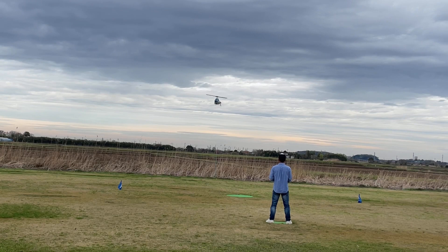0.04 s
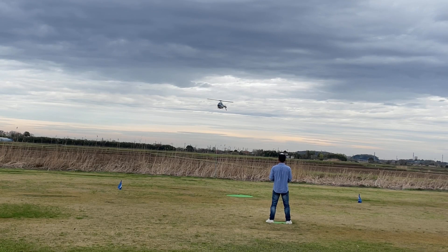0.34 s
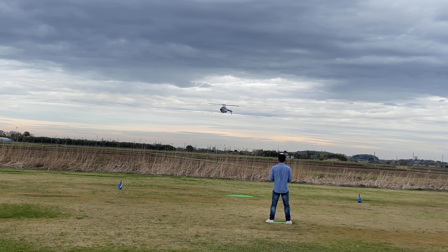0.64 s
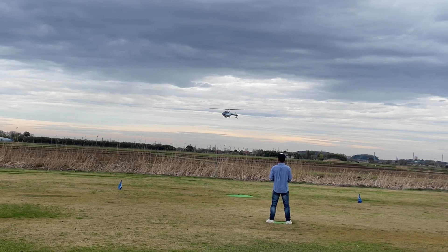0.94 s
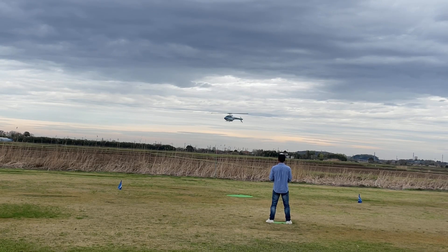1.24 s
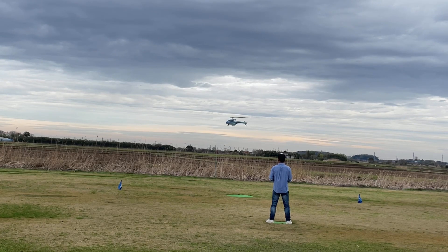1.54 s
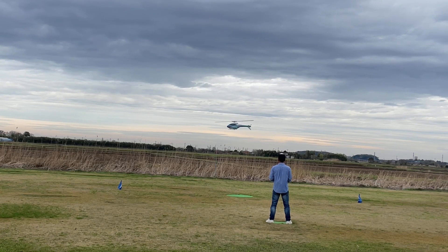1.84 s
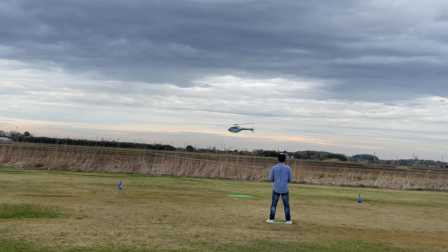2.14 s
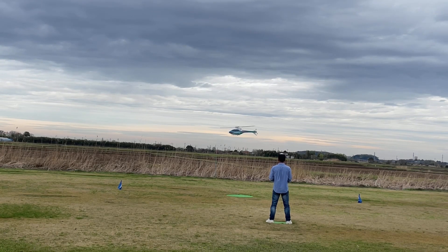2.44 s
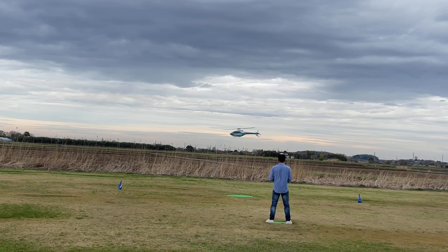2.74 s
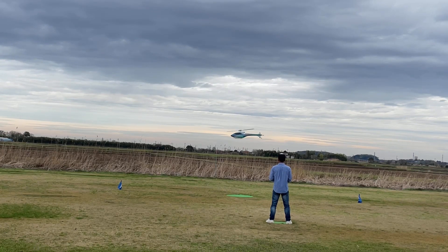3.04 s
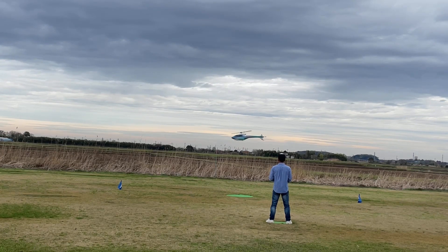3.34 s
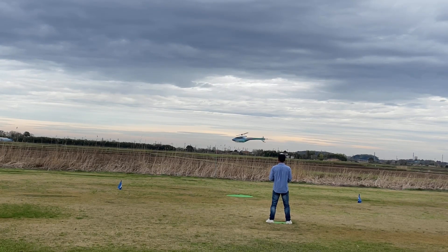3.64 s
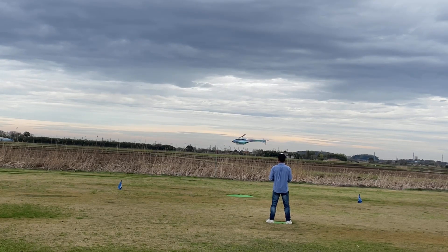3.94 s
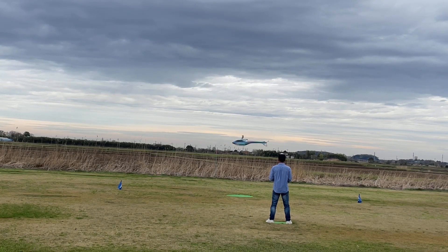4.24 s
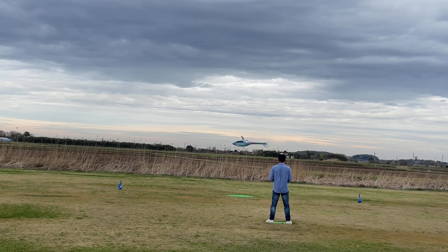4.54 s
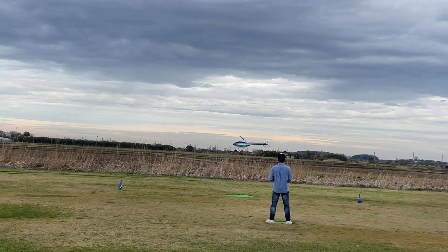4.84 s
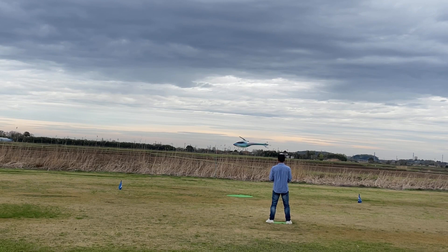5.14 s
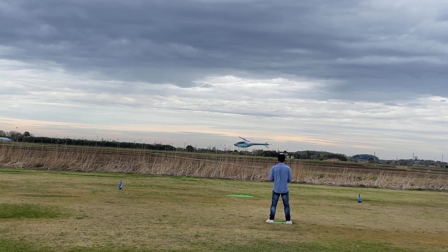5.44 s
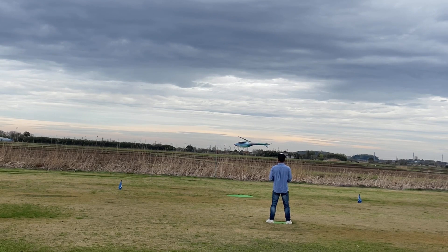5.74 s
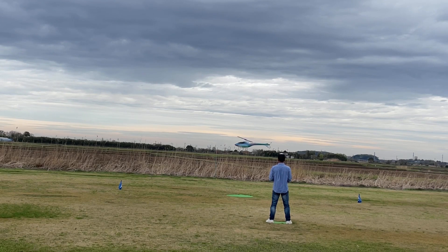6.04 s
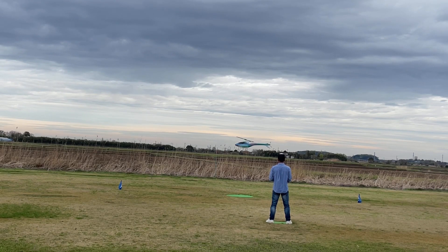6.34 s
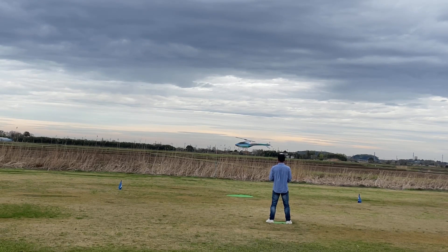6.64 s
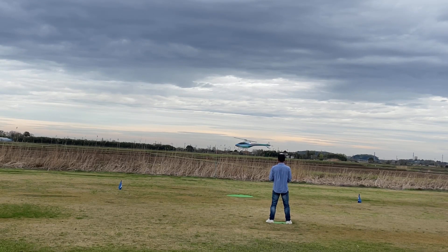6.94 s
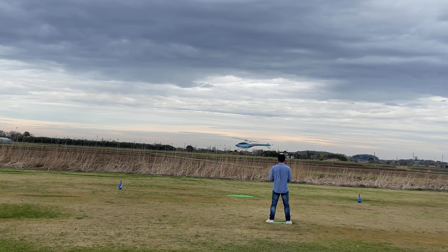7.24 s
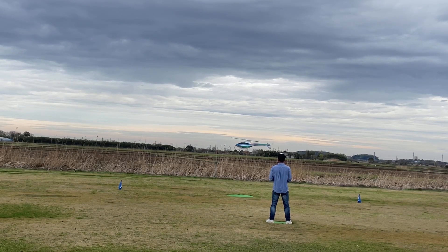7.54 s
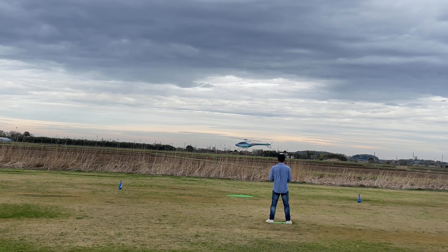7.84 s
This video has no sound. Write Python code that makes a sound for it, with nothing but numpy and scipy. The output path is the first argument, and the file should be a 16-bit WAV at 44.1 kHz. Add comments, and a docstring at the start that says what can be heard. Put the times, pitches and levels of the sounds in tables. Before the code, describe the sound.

An electric model helicopter drifts in over a grass field and settles into a low hover. Its blades swish and hiss, slapping harder midway, while the tail rotor drones and the gears whine thinly. Off to the left an engine idles, then briefly speeds up and runs down near the end. Light wind rumbles on the stereo microphones, and a far bird calls once, faintly.

```python
"""An electric model helicopter drifts in over a grass field and settles into a low hover.
Its main blades swish through the air and slap their own wake (the stirred air behind them), the tail
rotor drones and the gears whine. An echo off the ground sweeps the tone of the noise as it sinks.
Off to the left an engine idles, speeds up briefly and runs down. Light wind rumbles on the two
microphones, and a far bird calls once."""
import sys
import numpy as np
from scipy import signal
from scipy.fft import rfft, irfft
from scipy.io import wavfile

SR = 44100
rng = np.random.default_rng(int(sys.argv[2]) if len(sys.argv) > 2 else 0)


def unload_wav(signal):
    """Save mono or channel-first audio to the path in sys.argv[1] as 16-bit WAV at rate SR, clipped to [-1, 1]."""
    wavfile.write(
        sys.argv[1],
        SR,
        np.round(np.clip(np.atleast_2d(signal).T, -1, 1) * 32767).astype(np.int16),
    )


N = 348390
TIME, BINS_HZ = np.arange(N) / SR, np.fft.rfftfreq(N, 1 / SR)
TAIL_PER_MAIN = 7.579  # tail blade passes for each main blade pass
# how late the ground echo comes: (time [s], lag for the rotors [ms], lag for the blade tips [ms])
ECHO_LAGS = [(0, 1.52, 1.52), (.6, 1.38, 1.38), (1.2, 1.23, 1.23), (2, 1.09, 1.12), (2.6, 1.03, 1.08),
             (3.6, .95, 1.03), (4.2, .83, .82), (4.6, .8, .79), (7.9, .79, .8)]


def from_db(db):
    """Turn decibels into a gain to multiply by."""
    return 10 ** (np.asarray(db) / 20)


def rms_one(x):
    """Scale a signal to an average power of 1."""
    return x / np.sqrt(np.mean(x ** 2) + 1e-20)


def in_time(rows):
    """Read each column of a time table at every sample."""
    times, *columns = np.transpose(rows)
    return [np.interp(TIME, times, column) for column in columns]


def over_hz(points):
    """Read a table at every frequency, on a log scale."""
    hz, value = np.transpose(points)
    return np.interp(np.log(BINS_HZ + 1), np.log(hz), value)


def colour(x, spectrum):
    """Make some frequencies louder than others; the result has power 1."""
    return rms_one(irfft(rfft(x) * from_db(over_hz(spectrum)), N))


def noise(spectrum):
    """Noise with the given spectrum and power 1."""
    return colour(rng.standard_normal(N), spectrum)


def drift(rate):
    """A random wobble of typical size 1 that changes about `rate` times a second."""
    return rms_one(irfft(rfft(rng.standard_normal(N)) / (1 + (BINS_HZ / rate) ** 2), N))


def delayed(x, ms):
    """Make a signal late by a steady or moving lag."""
    fine = signal.resample_poly(x, up=4, down=1)
    return np.interp(TIME - ms / 1000, np.arange(4 * N) / (4 * SR), fine)


def lows_late(x, corner_hz):
    """An all-pass filter: the lows come late and the treble comes out upside down."""
    tangent = np.tan(np.pi * corner_hz / SR)
    weight = (tangent - 1) / (tangent + 1)
    return signal.lfilter([weight, 1], [1, weight], x)


def cycles(per_s):
    """Count the cycles done so far at a given rate."""
    return np.cumsum(per_s) / SR


def per_cycle(turn):
    """One random value for each cycle, changing halfway between whole counts."""
    return rng.uniform(-1.7, 1.7, size=1024)[np.round(turn).astype(int) % 1024]


def burst(turn, sharp, size_db):
    """A gain that rises and falls once a cycle; higher `sharp` makes it briefer."""
    return rms_one(np.exp(sharp * np.cos(2 * np.pi * turn)) * from_db(size_db))


def pulsing(turn, share, sharp, uneven_db, accent_db=0):
    """A gain that gathers a share (0-1) of the power into one burst a cycle."""
    bursts = burst(turn, sharp, uneven_db * per_cycle(turn)) * from_db(accent_db)
    return np.sqrt(1 - share + share * bursts ** 2)


def swells(rows, calm_db):
    """A gain with bell-shaped swells above a calm level."""
    bells = [from_db(db) * np.exp(-(2 * (TIME - peak_s) / length) ** 2) for peak_s, length, db in rows]
    return np.sqrt(from_db(calm_db) ** 2 + sum(bell ** 2 for bell in bells))


def turning(head_on, side_on, start_s=1, end_s=3.56):
    """Glide between two values as the helicopter turns from facing us to showing its side."""
    done = np.clip((TIME - start_s) / (end_s - start_s), 0, 1)
    return head_on + (side_on - head_on) * np.sin(np.pi * done / 2) ** 2


def over_grass(x, lag_ms, strength, soft_hz):
    """Add an echo off soft turf; it cancels some pitches, which rise as the lag shrinks."""
    echo = lows_late(delayed(x, lag_ms * (1 + 0.013 * drift(14))), soft_hz)
    return (x + strength * echo) / np.sqrt(1 + strength ** 2)


def at_microphones(x, fade_s=.12):
    """Each microphone hears its own level and timing, plus a faint, blurred echo."""
    # how much louder the left is: (frequency [Hz], left minus right [dB])
    balance = [(150, -1), (330, -2.2), (800, -1.8), (1500, -.2), (2200, -2.4), (3100, .8), (5000, -.4),
               (8000, 0)]
    # how far ahead the left is: (frequency [Hz], phase lead [radians])
    left_lead = [(20, 0), (2700, 0), (4200, -.2), (5500, -1.1), (6200, -1.4), (7000, -2.95), (7500, -3.14),
                 (8400, -3.1), (9000, -2.4), (10200, -1), (10600, -.1), (12100, .1), (12600, 1.1),
                 (14200, 3), (15800, 3.9)]
    # the faint, blurred echo, cut out around 8 kHz: (frequency [Hz], level [dB])
    blur_spectrum = [(200, -16.5), (1000, -17.5), (2500, -15), (5000, -9), (8000, -64), (14000, -11)]
    left = from_db(over_hz(balance) / 2) * np.exp(.5j * over_hz(left_lead))
    echoes = rng.standard_normal((2, SR // 8)) * from_db(-60 * TIME[:SR // 8] / fade_s)
    blur = rfft(echoes / np.linalg.norm(echoes[0]), N) * from_db(over_hz(blur_spectrum))
    return irfft(rfft(x) * (np.array([left, 1 / left]) + blur), N)


def wind(calm_db=-43.5):
    """Wind rumbles a little differently on each microphone; strong gusts reach higher in pitch."""
    # gusts, counted against calm_db: (peak time [s], length [s], strength [dB])
    gusts = [(1.12, 0.14, -35), (1.3, 0.21, -26.5), (1.75, 0.45, -29.5), (2.04, 0.17, -20.5),
             (2.26, 0.17, -26.5), (2.66, 0.055, -23), (2.82, 0.12, -28), (3.07, 0.073, -25),
             (3.37, 0.28, -26), (3.6, .1, -33), (4.05, 0.1, -30), (5.11, 0.16, -32), (7.16, 0.087, -37),
             (7.58, 0.084, -30)]
    # rumble of the breeze: (frequency [Hz], level [dB])
    breeze_spectrum = [(10, -32), (28, 7), (42, 8), (55, 22.5), (80, 14.5), (130, -14), (250, 1),
                       (600, -79)]
    # rumble of strong gusts: (frequency [Hz], level [dB])
    gust_spectrum = [(30, -7), (60, 1), (90, 18.5), (130, 2), (220, 2), (600, -101)]
    force = swells(gusts, calm_db + 3.2 * drift(4.6)) / from_db(calm_db)
    breeze_gain, gust_gain = from_db(-44) * force ** 0.23, from_db(-57.5) * force ** 1.08
    return sum(gain * (noise(spectrum) + 0.25 * np.array([noise(spectrum), noise(spectrum)]))
               for gain, spectrum in [(breeze_gain, breeze_spectrum), (gust_gain, gust_spectrum)])


def bird(start_s=5.33, length_s=.11, top_hz=7100, fall_hz=3250):
    """A far bird sings one thin note that falls ever faster."""
    done = np.clip((TIME - start_s) / length_s, 0, 1)
    note = np.sin(2 * np.pi * cycles(top_hz - fall_hz * done ** 2))
    return from_db(-51) * np.sin(np.pi * done) ** 2 * note


def engine(smear=.106):
    """Each firing rings the exhaust, smeared by the pipe, and lets out a puff of noise."""
    # how hard the engine works: (time [s], relative level [dB], unevenness [0-1])
    load = [(0, -32, 0.23), (3, -32, 0), (6.9, -31.5, 0), (7.08, -33, 0.3), (7.22, -34.5, 0.7),
            (7.4, -40, 0.3), (7.57, -39.5, 0.1), (7.72, -43, 0.5), (7.9, -51, 0.1)]
    # its speed: (time [s], firing rate [1/s])
    speed = [(0, 28.47), (2.5, 28.52), (3.6, 28.39), (4.2, 28.48), (5.2, 28.56), (5.9, 28.46), (7.1, 28.53),
             (7.24, 31.5), (7.4, 31.3), (7.57, 29.9), (7.72, 27.8), (7.9, 24)]
    # tones of the exhaust: (multiple of the firing rate, level [dB])
    exhaust_tones = [(2, -28), (3, -10), (4, -6.5), (5, -6.5), (6, 0.5), (7, -9.5), (8, -14.5), (9, -18),
                     (10, -30), (11, -24.5)]
    # noise of the puffs: (frequency [Hz], level [dB])
    puff_spectrum = [(50, -17), (110, 9), (180, -3.5), (250, 3.5), (330, -15), (600, -10), (2000, -104)]
    level_db, uneven = in_time(load)
    firings = .75 + cycles(in_time(speed)[0]) + 0.022 * uneven * drift(22)
    note = 0
    for multiple, db in exhaust_tones:
        gain = from_db(db + (0.73 + 1.5 * uneven) * drift(0.82))
        note += gain * np.cos(2 * np.pi * (multiple * firings + smear * multiple ** 2))
    puffs = from_db(-45.5 + 0.17 * (level_db - level_db.max())) * noise(puff_spectrum)
    puffs *= pulsing(firings - .8, share=0.57, sharp=1.4, uneven_db=3)
    sound = from_db(level_db - 0.97) * rms_one(note) + puffs
    return np.array([from_db(-0.5) * sound, delayed(sound, ms=0.87)])  # reaches the left first


def controller_whistle(pitch_hz=10982):
    """The motor's speed controller gives a faint, very high whistle."""
    # its loudness: (time [s], level [dB])
    loudness = [(0, -72), (.8, -65), (1.2, -77), (2.4, -75), (3.7, -75), (5.8, -75), (7.9, -79)]
    gain = np.sqrt(2) * from_db(in_time(loudness)[0] + 1.2 * drift(15))
    return gain * np.sin(2 * np.pi * cycles(pitch_hz + 14 * drift(60)))


def gear_whine(arrival_s=6.6):
    """Thin gear tones waver slightly and grow as the helicopter comes nearer."""
    # gear tones: (pitch [Hz], level at the start [dB], level in the hover [dB])
    tones = [(2495, -68, -56), (3350, -85, -62)]
    nearness = np.clip(TIME / arrival_s, 0, 1)
    whine = 0
    for hz, far_db, near_db in tones:
        gain = from_db(far_db + (near_db - far_db) * nearness + 0.92 * drift(8.7))
        whine += gain * np.sin(2 * np.pi * cycles(hz * (1 + 0.00029 * drift(35))))
    return np.sqrt(2) * whine


def thump_and_hum(passes):
    """The blades' lift thumps over a low hum of steady pitch; both grow as the helicopter turns."""
    # tones of the thump: (multiple of the blade rate, side-on level [dB])
    thump_tones = [(2, -60), (3, -60), (4, -56), (5, -50)]
    # hum tones, the highest near an overtone of the idling engine: (pitch [Hz], relative level [dB])
    hum_tones = [(109.8, -50), (153.5, -55), (185.2, -53), (249.3, -52), (255, -55)]
    thump = sum(from_db(db + 3.3 * drift(1.6)) * np.cos(2 * np.pi * multiple * passes)
                for multiple, db in thump_tones)
    hum = sum(from_db(db - 3.5 + drift(1.7)) * np.sin(2 * np.pi * hz * TIME) for hz, db in hum_tones)
    return np.sqrt(2) * from_db(turning(-7, 0)) * (thump + hum)


def tail_rotor(passes):
    """The tail blades drone, louder side-on; the main rotor's wake roughens the higher tones."""
    # steering makes the blades bite harder, adding overtones: (time [s], level [dB], bite [dB])
    steering = [(0, -1.5, -1.5), (1.3, -4.5, 7.5), (2.1, 1, 2), (3.3, 0, -0.5), (4.1, -.5, -3.5),
                (4.6, 0.5, -3.5), (4.8, 0.5, -8), (4.97, 1, -8), (5.25, 1.5, -6), (5.6, 0, .5),
                (6.1, 0.5, 0.5), (6.2, -0.5, -3), (6.37, -3.5, 3.5), (6.5, -4.5, 6.5), (6.6, -4.5, 8.5),
                (6.72, -2, 13), (7, -.5, 2.5), (7.15, -0.5, 5), (7.28, -0.5, -3), (7.4, -1, 3),
                (7.6, 1.5, -4.5), (7.83, -3, 8.5), (7.9, 1.5, -2)]
    # how deep the tail sits in the wake: (time [s], depth [0-1])
    wake_depth = [(0, .3), (3, .5), (4.2, 1), (5.2, .95), (5.7, .7), (6.6, .4), (7.9, .45)]
    # tones: (multiple of the blade rate, head-on level [dB], side-on level [dB], share of bite [0-1])
    tones = [(1, -58.5, -39.5, 0), (2, -48, -46, 0.52), (3, -61, -48.5, 0.94), (4, -61, -56.5, 0.59),
             (5, -66, -59, 0.2), (6, -61.5, -61, 0.65)]
    effort_db, bite_db = in_time(steering)
    wake, = in_time(wake_depth)
    shaken = passes + 0.014 * drift(27)
    drone = 0
    for multiple, head_on_db, side_on_db, bite_share in tones:
        level_db = turning(head_on_db, side_on_db) + effort_db + bite_share * bite_db
        gain = from_db(level_db + 0.5 * multiple * drift(6.2))
        # a complex wobble shakes both loudness and timing
        roughness = min(0.033 * multiple ** 2, .55) * wake * (drift(49) + 1j * drift(37))
        drone += gain * np.imag((1 + roughness) * np.exp(2j * np.pi * multiple * shaken))
    return over_grass(np.sqrt(2) * drone, in_time(ECHO_LAGS)[0], strength=0.47, soft_hz=2760)


def tip_swirls(calm_db=-74):
    """The blade tips shed whistling swirls of air in manoeuvres, and sizzle as the rotor tilts to us."""
    # swells of whistling: (peak time [s], length [s], level [dB])
    whistles = [(2.68, .25, -53), (3.35, 0.75, -47.5)]
    # their tone: (frequency [Hz], level [dB])
    whistle_spectrum = [(3500, -25), (4600, -5), (5350, 3), (5900, -.5), (6500, -4), (7300, -3),
                        (9500, -22)]
    # swells of sizzling: (peak time [s], length [s], level [dB])
    sizzles = [(3.55, 0.7, -53), (4.75, 0.46, -52)]
    # their tone: (frequency [Hz], level [dB])
    sizzle_spectrum = [(5500, -20), (7500, 3), (9000, 2.5), (10200, -1), (12000, -4), (15700, -13)]
    whistle = swells(whistles, calm_db) * noise(whistle_spectrum)
    return whistle + swells(sizzles, calm_db) * noise(sizzle_spectrum)


def tip_hiss(passes):
    """The blade tips hiss, pulsing with each pass and fluttering at each turn of the tail shaft."""
    # loudness of the hiss: (time [s], relative level [dB])
    loudness = [(0, -56), (.35, -51), (.75, -50.5), (1.2, -51.5), (1.5, -51), (2.05, -53), (2.45, -52.5),
                (2.6, -49), (2.85, -48.5), (3.4, -46), (4.1, -46.5), (4.3, -45), (4.9, -46), (5.5, -47),
                (6.25, -51), (6.5, -45.5), (6.67, -43), (6.78, -48.5), (6.87, -42.5), (7.08, -44.5),
                (7.16, -49.5), (7.29, -42.5), (7.42, -47), (7.58, -51), (7.9, -50.5)]
    # its tone: (frequency [Hz], level [dB])
    spectrum = [(1500, -25), (3000, 2), (3500, 2), (3950, -2), (4350, 2), (4650, 0), (5000, 4), (5280, 0),
                (5750, 4), (6300, -2), (6800, -1), (8000, -5.5), (9000, -7), (10000, -8.5), (12500, -16.5),
                (15700, -12.5)]
    hiss = from_db(in_time(loudness)[0] + 2 + drift(18)) * noise(spectrum)
    hiss *= pulsing(passes - turning(.05, 0), share=turning(0.51, 0.064), sharp=1.14, uneven_db=0.5)
    return hiss * pulsing(passes * TAIL_PER_MAIN / 3, share=0.12, sharp=2.5, uneven_db=4)


def blade_slaps(passes, accent_db):
    """Each blade cuts the wake of the one before, making a short smack that falls in pitch."""
    # strongest as the rotor sinks into its own wake: (time [s], relative level [dB])
    loudness = [(0, -53.5), (.8, -58), (1.6, -53.5), (2.3, -46), (3.1, -59), (3.65, -43), (3.95, -47),
                (4.3, -39.5), (4.8, -42.5), (5.6, -45), (6.1, -55), (6.6, -46), (7.2, -49.5), (7.5, -49.5),
                (7.9, -51)]
    # tone of a smack: (frequency [Hz], level [dB])
    spectrum = [(40, -27), (130, 1), (260, 7), (440, 8.5), (600, 3), (1000, -8), (1500, -19), (3000, -31),
                (8000, -68)]
    clicks = np.diff(np.floor(passes + 0.0034 * drift(17)), prepend=np.floor(passes[0]))
    smacks = colour(clicks * from_db(1.6 * per_cycle(passes) + .3 * accent_db), spectrum)
    for _ in range(10):  # holding back the lows makes the pitch fall
        smacks = lows_late(smacks, corner_hz=495)
    return from_db(in_time(loudness)[0] + .5) * smacks


def blade_air(passes, accent_db):
    """Air washes down from the rotor; each blade swishes and cracks as it sweeps toward us."""
    # loudness of the air: (time [s], relative wash level [dB], relative swish level [dB])
    loudness = [(0, -48, -43.5), (.6, -46, -41), (1.3, -45.5, -40.5), (2.1, -48, -44), (2.7, -48, -49.5),
                (3.5, -48, -45), (3.95, -48, -46.5), (4.3, -46.5, -45), (5.1, -46.5, -47), (6.2, -47, -46),
                (6.7, -46.5, -45.5), (7.2, -47, -47), (7.9, -45, -44)]
    # tone of the wash: (frequency [Hz], level [dB])
    wash_spectrum = [(150, -9), (300, 0.5), (500, -4.5), (750, -1), (1000, -1), (1300, -7), (1800, -6.5),
                     (4000, -58)]
    # tone of the swish and crack: (frequency [Hz], level [dB])
    swish_spectrum = [(500, -10.5), (1000, -5), (1500, -0.5), (2200, 0.5), (3200, -4), (4200, -10.5),
                      (6000, -21), (12000, -54)]
    wash_db, swish_db = in_time(loudness)
    # head-on, the wash comes just before the swish and the crack just after
    wash_passes, crack_passes = passes + turning(0.11, 0), passes - turning(.14, 0)
    wash = from_db(wash_db + 3.5 + 0.52 * drift(10)) * noise(wash_spectrum)
    wash *= pulsing(wash_passes, share=0.36, sharp=turning(2, 2.76), uneven_db=1.2,
                    accent_db=accent_db * turning(0, 0.9))
    swish = from_db(swish_db + turning(-1, -1.26) + 0.48 * drift(19)) * noise(swish_spectrum)
    swish *= pulsing(passes, share=turning(0.68, 0.1), sharp=4.8, uneven_db=2.2,
                     accent_db=0.22 * accent_db)
    crack = from_db(swish_db + turning(-5.5, -17) + accent_db * turning(1, 2)) * noise(swish_spectrum)
    crack *= burst(crack_passes, sharp=12, size_db=.7 * per_cycle(passes))
    return wash + swish + crack


def main_rotor(passes):
    """The big blades swish and slap while their tips hiss; all of it echoes off the grass."""
    # passes that hit harder, scaled by each layer in its own way: (time [s], accent [dB])
    hard_passes = [(.018, 4), (.065, 7.5), (.111, 8), (.314, 5.5), (.82, 3), (.89, 3), (1.213, 3),
                   (1.35, 4), (1.42, 5), (4.157, 5), (4.178, 6.5), (4.295, 3), (4.385, 3), (4.41, 3),
                   (4.961, 5), (5.006, 7.5), (5.4, 2), (7.105, 4), (7.47, 5)]
    pass_number = np.round(passes)
    accent_db = sum(db * (pass_number == np.interp(at_s, TIME, pass_number).round())
                    for at_s, db in hard_passes)
    air = blade_air(passes, accent_db)
    tips = tip_hiss(passes) + tip_swirls()
    slaps = blade_slaps(passes - 0.035, accent_db)
    rotor_ms, tips_ms = in_time(ECHO_LAGS)
    blades = over_grass(air + slaps, rotor_ms, strength=0.41, soft_hz=1930)
    return blades + over_grass(tips, tips_ms, strength=turning(.14, .08), soft_hz=1420)


def scene():
    """Mix the helicopter, its rotors geared to one nearly steady shaft, with bird, engine and wind."""
    # speed of the tail rotor: (time [s], blade passes [1/s])
    tail_speed = [(0, 329.5), (2.2, 329.4), (3.3, 330.2), (4.4, 328.7), (5.5, 329.4), (6.6, 328.1),
                  (7.5, 329.5), (7.9, 329.5)]
    tail_passes = cycles(in_time(tail_speed)[0])
    main_passes = tail_passes / TAIL_PER_MAIN + 0.3177
    rotors = main_rotor(main_passes) + tail_rotor(tail_passes)
    tones = thump_and_hum(main_passes) + gear_whine() + controller_whistle()
    return at_microphones(rotors + tones + bird()) + engine() + wind()


def record(dry):
    """Cut the highest treble steeply."""
    cutoff_hz = 15750
    return signal.sosfilt(signal.ellip(12, .1, 90, cutoff_hz, fs=SR, output="sos"), dry)


dry = scene()
out = record(dry)
unload_wav(out)
```